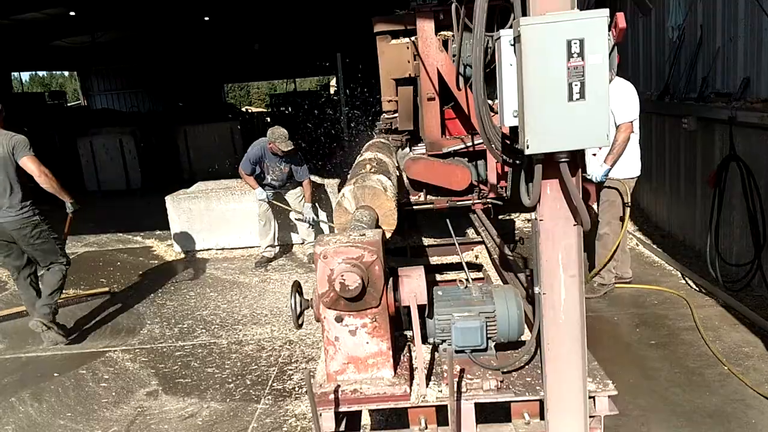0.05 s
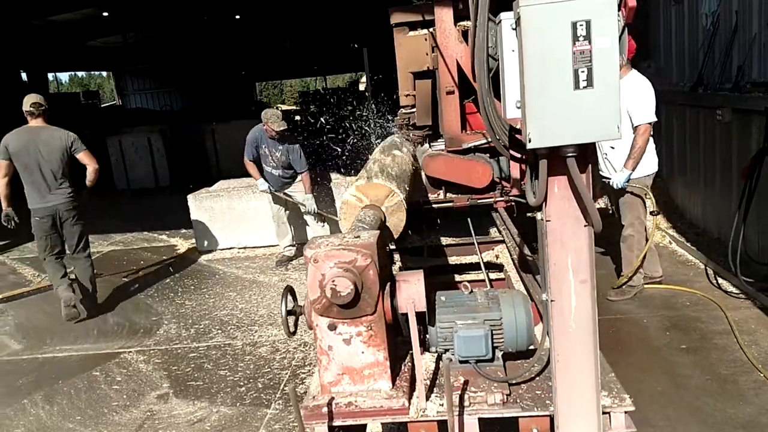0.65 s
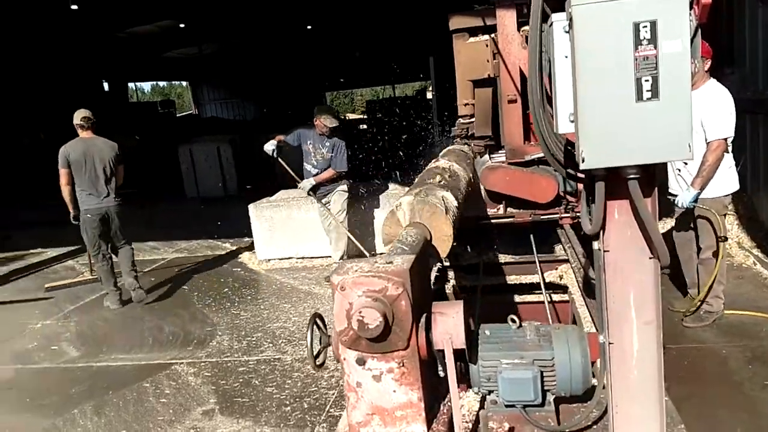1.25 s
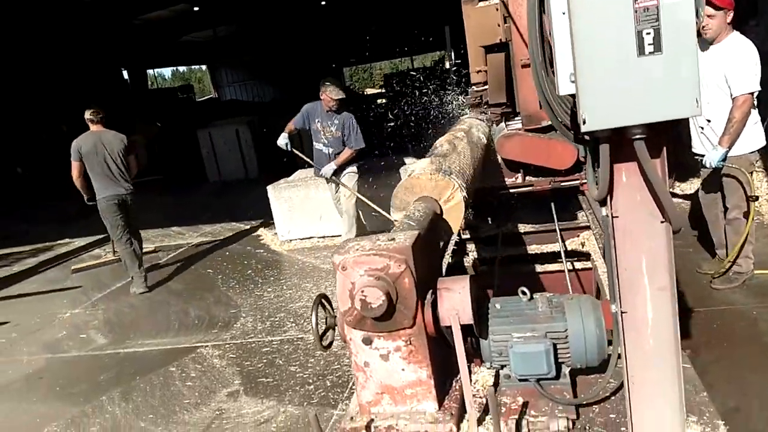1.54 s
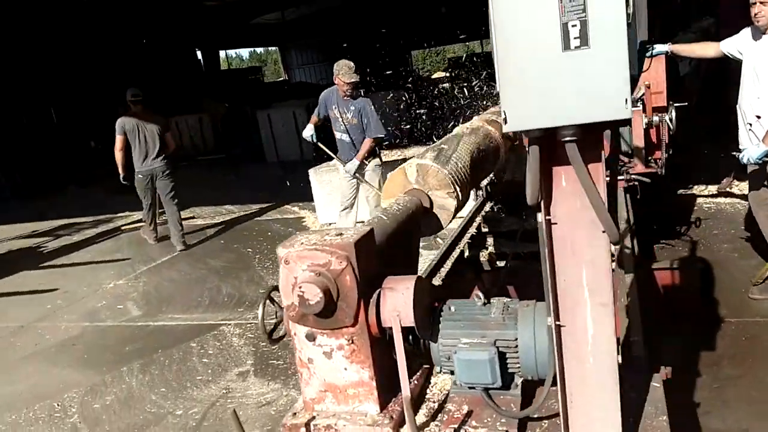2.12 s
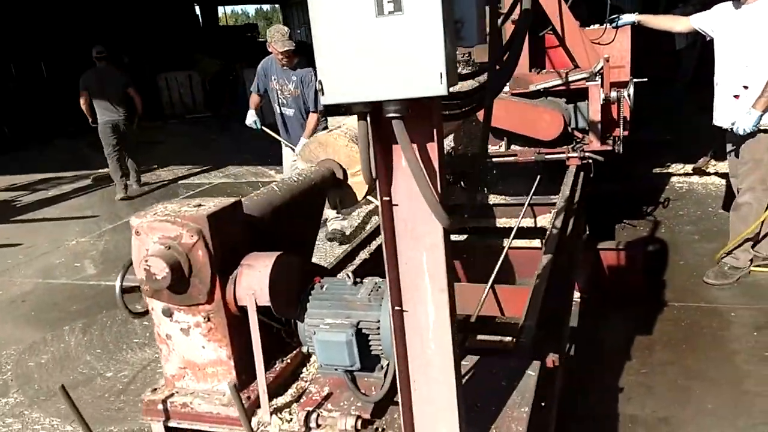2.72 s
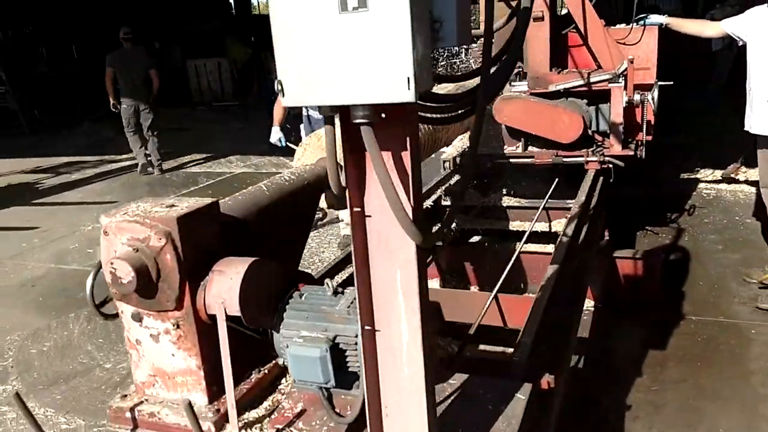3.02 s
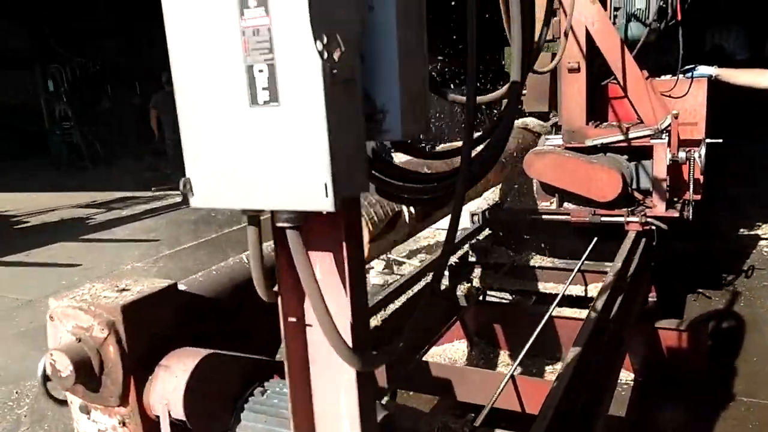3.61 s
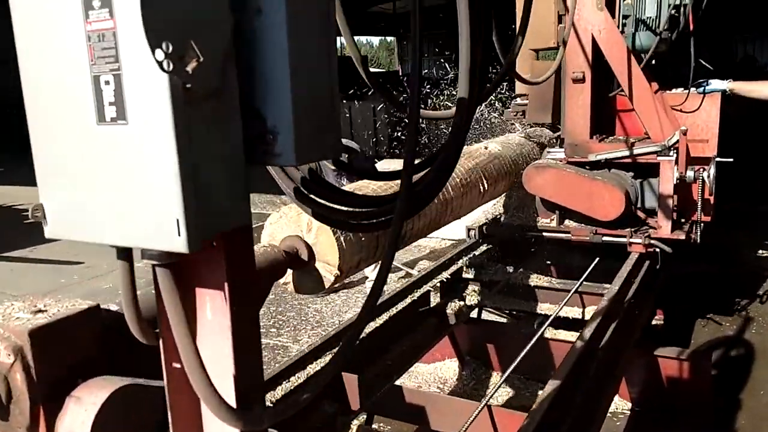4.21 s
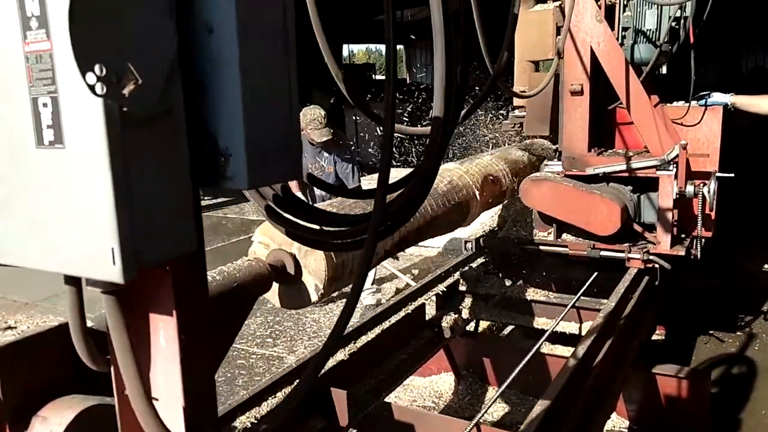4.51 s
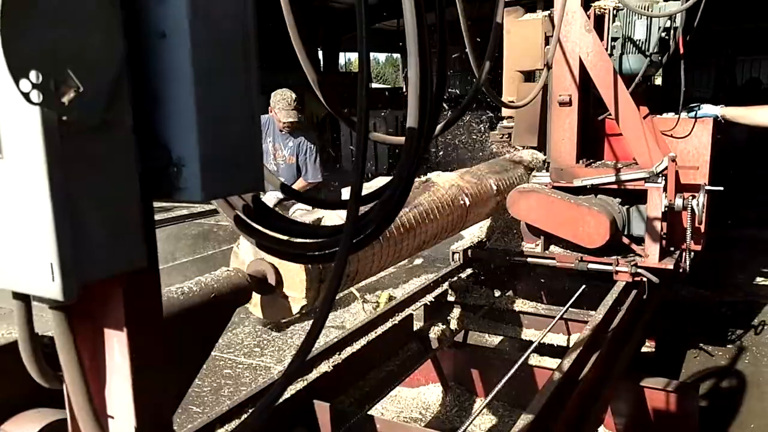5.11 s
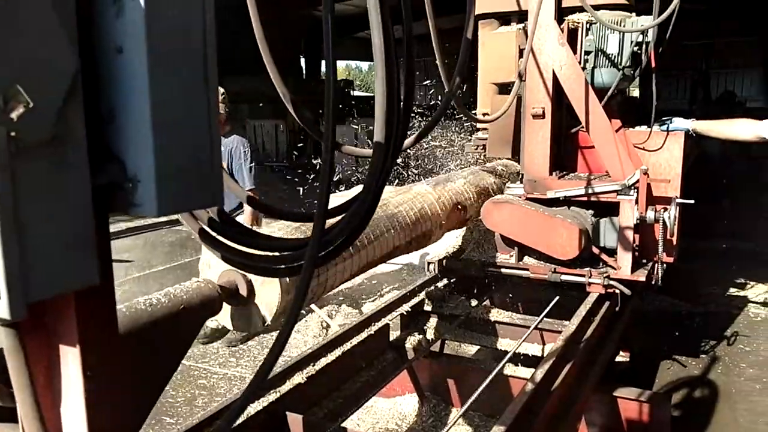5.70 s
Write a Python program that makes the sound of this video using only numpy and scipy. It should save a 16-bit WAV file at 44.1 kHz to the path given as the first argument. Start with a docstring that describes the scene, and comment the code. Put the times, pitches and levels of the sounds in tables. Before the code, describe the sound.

A loud, rough rasp of tearing wood swells and eases roughly every second and a quarter as a motorized lathe shaves a turning log. Each surge brings crackling splinters, hissing chips and a booming, howling chatter that dips a little in pitch. Between the cuts the knives hum, while the frame rumbles and the motors and belts drone throughout. The microphone is a few metres off, in an open shed with a light echo.

```python
"""In an open shed, a log lathe rounds a post, heard from a phone a few metres away.
Fast spinning knives bite into the slowly turning log and run nearly free once a turn, where it is thin.
Each bite cracks the wood, throws chips and makes the log and frame drone, boom, growl and howl.
The knives hum in the air, and their pitch sags as the motor takes the load.
Behind them the frame rumbles, motors and belts drone, and the shed echoes."""
import sys
import numpy as np
from scipy import signal
from scipy.fft import rfft, irfft
from scipy.io import wavfile
from scipy.ndimage import uniform_filter1d

SR = 44100
rng = np.random.default_rng(int(sys.argv[2]) if len(sys.argv) > 2 else 0)


def output_pcm(signal):
    """Save a mono or channel-first signal as 16-bit PCM at the path in sys.argv[1].

    Samples are clipped to [-1, 1] before scaling.
    """
    pcm = np.clip(np.atleast_2d(signal).T, -1, 1) * 32767
    wavfile.write(sys.argv[1], SR, np.round(pcm).astype(np.int16))


N = 253575
TIME = np.arange(N) / SR
FREQ = np.fft.rfftfreq(2 * N, 1 / SR)

# The turns of the log. Each row: when the knives catch, length of the cut and time to grip, in seconds;
# motor sag in Hz; then, in dB, crack boost, roar boost, drone level, rumble boost,
# and boosts going into and out of the wood for boom, for growl and for howl.
LOG_TURNS = [(-.24, 1.032, .05, 1.51, -1, -3.5, -43, 1, -2, 1.5, -3, -5, -1, 2.5),
             (1.025, 1.005, .025, 1.65, -1, -2, -47, -0.5, -1.5, 3, -5.5, -11, -1.5, -0.5),
             (2.281, .99, 0.037, 1.9, -1, -.5, -62, 0, 1, 4, -0.5, 4, -1.5, 3),
             (3.536, 0.966, 0.042, 1.85, 0.2, 0.5, -40.5, 0, 4, 0.5, 0, -5, 1, -2.5),
             (4.85, 0.87, 0.076, 1.98, -0.7, .5, -38, -3, -1.5, -6.5, -2, 1.5, 0, -3)]
# The same wood comes round on every turn, thickest in the middle of the cut.
# Each row: seconds since the catch, crack level in dB, chip spray level in dB.
CUT_LEVELS = [(0, -32.5, -24), (.16, -25.5, -22.5), (.29, -22, -20), (.39, -23.5, -20), (.58, -19, -20.5),
              (.82, -27.5, -22.5), (.97, -27.5, -22)]
# Patches of harder or softer wood.
# Each row: middle and length in seconds, then boosts in dB for crack, chip spray and boom.
WOOD_PATCHES = [(0.364, 0.034, 5, 0, 2.5), (0.493, 0.063, 6, 1, -0.5), (0.921, 0.068, 7, 6, -6),
                (1.084, 0.055, 7, 2.5, 2), (1.301, 0.084, -1, 4, -2.5), (1.627, 0.16, 0.5, 0.5, -0.5),
                (1.88, 0.26, -0.5, -1.5, -8.5), (2.334, .05, 6, 2, -4), (2.565, 0.027, 3, 1, 0),
                (2.74, 0.23, -0.5, -2.5, 6.5), (2.96, 0.04, 2, 3.5, 0), (4.195, 0.12, 0, 0, -12.5),
                (5.45, 0.11, -3, -1, -14)]
# The tone of cracking wood and of flying chips. Each row: frequency in Hz, level in dB.
CRACK_SPECTRUM = [(200, -53), (900, -5.5), (1450, -0.5), (1800, -2), (2100, -9.5), (2600, 1), (3500, -0.5),
                  (5300, 2.5), (7200, -1.5), (10000, -12), (16000, -34)]
SPRAY_SPECTRUM = [(200, -46), (1000, -18), (2500, -10), (5000, -4), (7500, 0.5), (10000, -1.5), (12500, -8),
                  (15500, -14)]
# The log chatters as the knives enter and again as they leave.
# Each row: seconds since the catch, then boom, growl and howl levels in dB.
CHATTER_LEVELS = [(0, -36.5, -47.5, -38), (.06, -29.5, -37, -30.5), (.26, -25, -34, -24.5),
                  (.39, -29, -37.5, -37), (.58, -30, -40, -37), (.75, -30, -39.5, -37.5),
                  (.96, -29.5, -35, -32.5), (1.06, -40.5, -56, -40.5), (1.17, -35.5, -48.5, -66),
                  (1.26, -34.5, -46.5, -39)]
# The growl's overtones. Each row: multiple of the rate of deep bites, level in dB.
GROWL_OVERTONES = [(1, -16.5), (5, -10.5), (6, 0), (7, -3), (9, -8), (10, -4)]
# The knives' hum as the phone moves round the machine. Each row: time in seconds, relative level in dB.
HUM_LEVELS = [(0.3, -44), (0.54, -57), (0.75, -39), (1.71, -43), (2.41, -34), (2.61, -42), (3.27, -35.5),
              (3.44, -47), (4.28, -42), (4.76, -30.5), (5.41, -41), (5.75, -36)]
# The frame shakes most just after the catch.
# Each row: seconds since the catch, roar level in dB, rumble level in dB.
SHAKE_LEVELS = [(0, -31, -35.5), (.22, -28, -37.5), (.45, -33.5, -42), (.8, -33.5, -42), (1.2, -31, -38.5)]
# The tone of the frame's roar and of its low rumble. Each row: frequency in Hz, level in dB.
ROAR_SPECTRUM = [(150, -45), (330, -7.5), (480, 3), (700, 0), (950, -4.5), (1300, -1), (1700, -11),
                 (2500, -20.5), (6000, -19), (15000, -50)]
RUMBLE_SPECTRUM = [(25, -44), (50, -13), (75, -14.5), (110, -4.5), (160, 2), (240, 1), (400, -6.5),
                   (900, -33)]
# The steady tones of motors and belts. Each row: pitch in Hz, level in dB.
MOTOR_TONES = [(74, -60.5), (226, -51), (247, -54), (678, -45.5)]
# The phone's body shades its far microphone. Each row: frequency in Hz, gain in dB.
FAR_MIC_SHADOW = [(2000, -3), (6000, -5), (7500, -2.5), (9500, -12), (13000, -4), (15500, -10)]
# How much of the other microphone is taken away to widen the sound. Each row: frequency in Hz, gain in dB.
WIDENING = [(100, -5.5), (2200, 0.5), (4400, -0.5), (6600, -7), (9000, -28.5), (12000, -37)]
# The phone lifts the bass after widening. Each row: frequency in Hz, gain in dB.
BASS_LIFT = [(25, 5), (60, 10.5), (150, 8), (300, 4), (600, -0.98), (1100, -2), (1500, -2), (2000, -0.5)]


def cutting(passes):
    """Each bite cracks and tears wood; chips spray against the steel. `passes` counts the knife passes."""
    crack_db, spray_db = every_turn(CUT_LEVELS)
    patch_crack_db, patch_spray_db, _ = wood_patches()
    crack_db = knife_grip(crack_db + this_turn()["crack_db"], skimming_db=-42) + patch_crack_db
    spray_db = knife_grip(spray_db, skimming_db=-41.5) + patch_spray_db
    after_bite = np.exp(-(passes % 1) / 0.9)
    knots = gain(1.04 * wobble(45))
    rasp = changing_wood(bites(passes), rate=22, t60=.04)
    # the deeper the cut, the more the pitched rasp stands out of the tearing
    rasp *= gain(0.055 * (crack_db - np.median(crack_db)))
    tearing = smear(after_bite * clicks(rate=9000, spread_db=3.0), t60=0.038)
    crack = normalize(filtered(rasp + gain(-5.5) * tearing, response(CRACK_SPECTRUM)))
    chips = smear((after_bite + 1.4) * clicks(rate=7000, spread_db=1.5), t60=0.0057)
    spray = normalize(filtered(chips, response(SPRAY_SPECTRUM)))
    near, far = knots * (gain(crack_db) * crack + gain(spray_db) * spray)
    return np.array([near, filtered(far, response(FAR_MIC_SHADOW))])


def bites(passes, uneven_db=1.6, shallow_share=.72, jitter_s=.000013):
    """One sharp pulse per knife; every second knife cuts less deep."""
    knife = np.arange(1, int(passes[-1]))
    timing, strength = rng.standard_normal((len(knife), 2)).T
    at = (np.interp(knife, passes, TIME) + jitter_s * timing) * SR
    size = gain(uneven_db * strength) * np.where(knife % 2, shallow_share, 1)
    nearby = at.astype(int)[:, None] + np.arange(-5, 7)
    pulses = size[:, None] * np.sinc(nearby - at[:, None])  # lets a pulse fall between samples
    return np.bincount(np.clip(nearby, 0, N - 1).ravel(), pulses.ravel(), N)


def knife_rate(free_deep_bite_hz=149.08, load_s=1.16):
    """Knife passes per second: the motor sags under the load of each cut, then recovers."""
    turn = this_turn()
    progress = np.minimum(turn["age"] / load_s, 1)
    load = np.abs(np.sin(np.pi * progress)) ** .8
    return 2 * eased(free_deep_bite_hz - turn["sag_hz"] * load)  # two passes per deep bite


def knife_grip(cutting_db, skimming_db, release_s=0.15):
    """Level in dB as the knives grip quickly, hold through the cut, then only skim the log."""
    turn = this_turn()
    entering = (turn["age"] / turn["grip_s"]) ** 0.62
    leaving = 1 - (turn["age"] - turn["cut_s"]) / release_s
    grip = np.clip(np.minimum(entering, leaving), 0, 1)
    return eased(skimming_db + grip * (cutting_db - skimming_db))


def wood_patches():
    """Each patch of wood is one smooth swell or dip of crack, spray and boom, in dB."""
    return sum(np.outer(boosts_db, .5 ** ((2 * (TIME - middle) / length) ** 2))
               for middle, length, *boosts_db in WOOD_PATCHES)


def changing_wood(pulses, rate, t60, paths=4):
    """The knives keep meeting new wood, so echo paths blend and the rasp's overtones come and go."""
    shares = np.array([[wobble(rate), wobble(rate)] for _ in range(paths)])
    shares /= np.sqrt(np.sum(shares ** 2, axis=0) + .1)
    return normalize(np.sum([share * smear(pulses, t60) for share in shares], axis=0))


def cutter_tones(passes):
    """The knives hum; deep and shallow bites take turns and make the log and frame sound low tones."""
    hum_db = np.interp(TIME, *np.transpose(HUM_LEVELS)) + 2
    drone_db = knife_grip(this_turn()["drone_db"], skimming_db=-46)
    boom_db, growl_db, howl_db = chatter()
    _, _, patch_boom_db = wood_patches()
    deep_bites = passes / 2
    hum = gain(hum_db) * overtone(deep_bites, 2, waver_db=2.4, drift=.14)
    drone = overtone(deep_bites, 3, waver_db=.8, drift=.22)
    drone += gain(-5) * overtone(deep_bites, 5, waver_db=1.1, drift=.22)
    boom = gain(boom_db + patch_boom_db) * overtone(deep_bites, 4, waver_db=.8, drift=.25)
    howl = gain(howl_db) * overtone(deep_bites, 8, waver_db=1.6, drift=.4)
    growl = sum(gain(db) * overtone(deep_bites, round(multiple), waver_db=1.1, drift=.28)
                for multiple, db in GROWL_OVERTONES)
    return hum + gain(drone_db) * drone + boom + howl + gain(growl_db) * growl


def overtone(cycles, multiple, waver_db, drift):
    """One overtone of the bites; it wavers as new wood turns under the knives."""
    level = np.sqrt(2) * gain(waver_db * wobble(20))
    return level * np.cos(2 * np.pi * multiple * cycles + drift * wobble(20))


def chatter(entry_s=0.44, exit_s=0.84):
    """Boom, growl and howl in dB: the log chatters harder or softer on each way in and out."""
    turn = this_turn()
    leaving = np.clip((turn["age"] - entry_s) / (exit_s - entry_s), 0, 1)
    return [eased(db + (1 - leaving) * turn[name + "_in"] + leaving * turn[name + "_out"])
            for name, db in zip(("boom", "growl", "howl"), every_turn(CHATTER_LEVELS))]


def frame_shaking():
    """Splinters knock on log and steel and the frame rumbles: one direct signal, one from all around."""
    turn = this_turn()
    roar_db, rumble_db = every_turn(SHAKE_LEVELS)
    roar = normalize(filtered(clicks(rate=3000, spread_db=2.0), response(ROAR_SPECTRUM)))
    rumble = normalize(filtered(clicks(rate=900, spread_db=2.0), response(RUMBLE_SPECTRUM)))
    roar *= gain(eased(roar_db + turn["roar_db"]))
    rumble *= gain(eased(rumble_db + turn["rumble_db"]))
    return roar + rumble


def motors():
    """Motors and belts drone on, slightly unsteady."""
    return sum(gain(db + .55 * wobble(13)) * np.sqrt(2) * np.sin(2 * np.pi * hz * TIME + .5 * wobble(6))
               for hz, db in MOTOR_TONES)


def this_turn():
    """The current turn's settings at every sample; "age" is the seconds since the knives caught."""
    rows = np.array(LOG_TURNS)
    start, *columns = rows[np.searchsorted(rows[:, 0], TIME, side="right") - 1].T
    names = ("cut_s grip_s sag_hz crack_db roar_db drone_db rumble_db "
             "boom_in boom_out growl_in growl_out howl_in howl_out").split()
    return dict(zip(names, columns), age=TIME - start)


def every_turn(table):
    """Play a table's level curves again on every turn of the log."""
    seconds, *columns = np.transpose(table)
    age = this_turn()["age"]
    return [np.interp(age, seconds, column) for column in columns]


def clicks(rate, spread_db):
    """Two streams of random clicks of very unequal size, about `rate` a second."""
    hit = rng.random((2, N)) < rate / SR
    size = gain(spread_db * np.minimum(rng.exponential(size=(2, N)), 5))
    return normalize(hit * rng.choice([-1, 1], (2, N)) * size)


def smear(x, t60):
    """Echoes spread a sound over about t60 seconds and keep its tone; one signal per microphone."""
    echoes = rfft(rng.standard_normal((2, N)) * gain(-60 * TIME / t60), 2 * N)
    return normalize(filtered(x, echoes / np.abs(echoes)))


def wobble(rate):
    """A smooth random curve, about 1 in size, that takes a new value `rate` times a second."""
    hold = int(SR / rate)
    steps = np.repeat(rng.standard_normal(N // hold + 1), hold)
    return np.sqrt(2) * uniform_filter1d(uniform_filter1d(steps, hold), hold)[:N]


def eased(x):
    """Round off a curve's corners over 20 ms."""
    return uniform_filter1d(x, size=SR // 50)


def gain(db):
    """Turn decibels into a multiplier."""
    return 10 ** (np.asarray(db) / 20)


def normalize(x):
    """Scale to an average (rms) level of 1."""
    return x / np.sqrt(np.mean(x ** 2))


def response(points):
    """Gain at every frequency from (Hz, dB) points."""
    hz, db = np.transpose(points)
    return gain(np.interp(np.log(FREQ + 1), np.log(hz), db))


def delay(seconds):
    """A response that makes a sound arrive later."""
    return np.exp(-2j * np.pi * FREQ * seconds)


def filtered(x, gains):
    """Give each frequency its own gain."""
    return irfft(rfft(x, 2 * N) * gains)[..., :N]


def scene():
    """Low tones reach both microphones nearly in step, cracks and chips do not; the shed adds its echo."""
    passes = np.cumsum(knife_rate()) / SR
    shaking, all_around = frame_shaking()
    low_near = cutter_tones(passes) + motors() + shaking
    low_far = 0.36 * filtered(low_near, delay(.00001)) + gain(-13.5) * all_around
    cut = cutting(passes)
    shed_echo = gain(-19.5) * np.std(cut) * smear(cut + shaking, t60=0.62)
    return np.array([low_near, low_far]) + cut + shed_echo


def record(dry, start_s=.115, fade_s=0.2, fade_from_db=-12.5, top_hz=15850):
    """The phone widens the sound, lifts the bass, starts abruptly, fades up and cuts the top treble."""
    other_mic = filtered(dry[::-1], response(WIDENING) * delay(.000453))
    wide = filtered(dry - other_mic, response(BASS_LIFT))
    fade = gain(fade_from_db * np.clip(1 - (TIME - start_s) / fade_s, 0, 1)) * (TIME > start_s)
    treble_cut = signal.ellip(10, .1, 80, top_hz, fs=SR, output="sos")
    return signal.sosfilt(treble_cut, wide * fade)


dry = scene()
out = record(dry)
output_pcm(out)
```